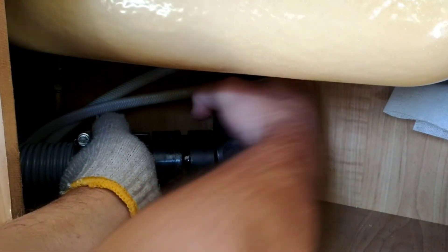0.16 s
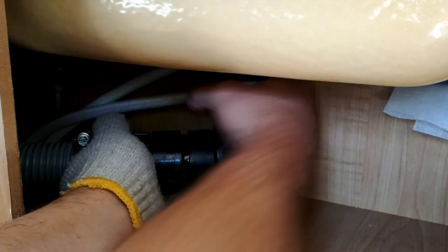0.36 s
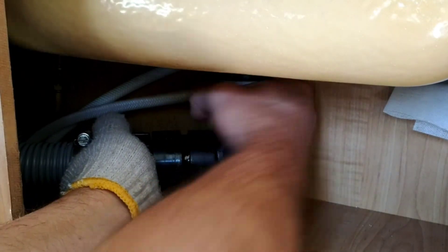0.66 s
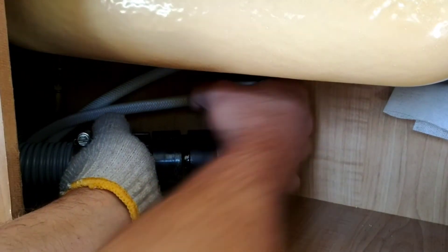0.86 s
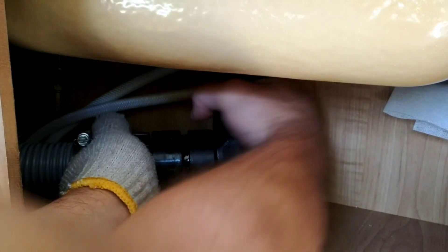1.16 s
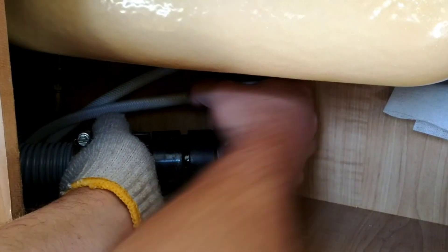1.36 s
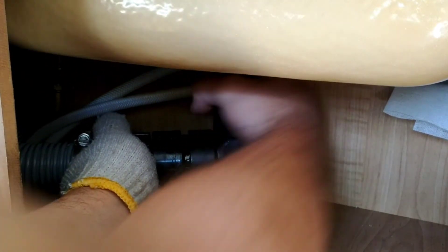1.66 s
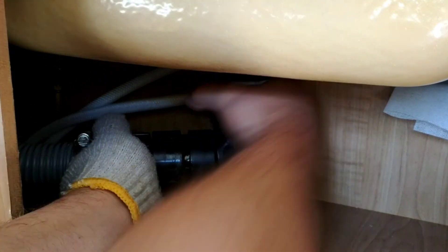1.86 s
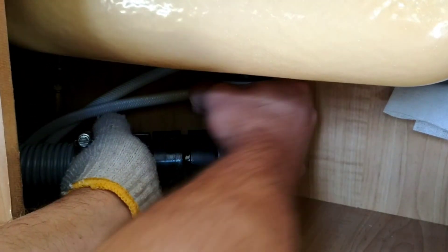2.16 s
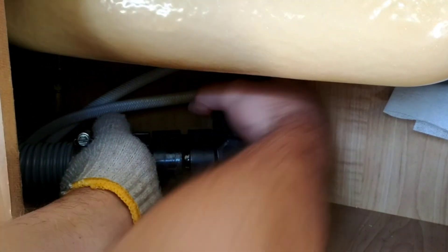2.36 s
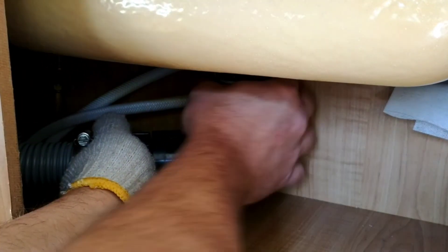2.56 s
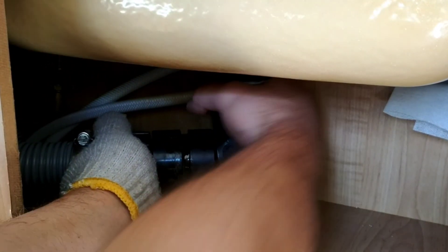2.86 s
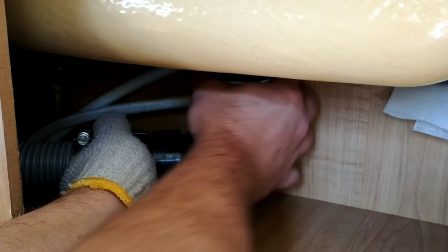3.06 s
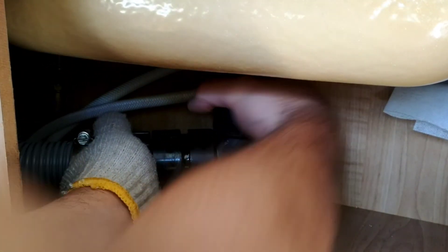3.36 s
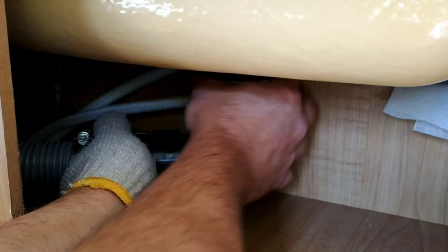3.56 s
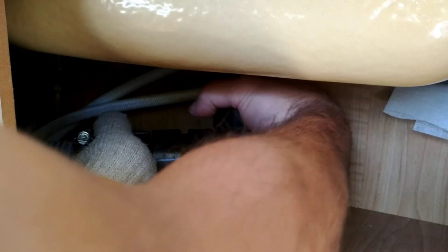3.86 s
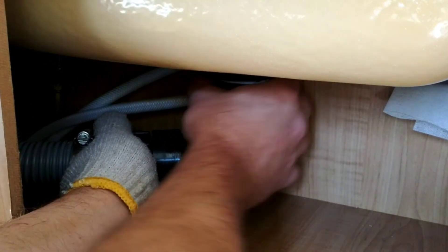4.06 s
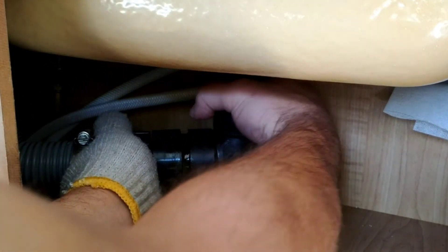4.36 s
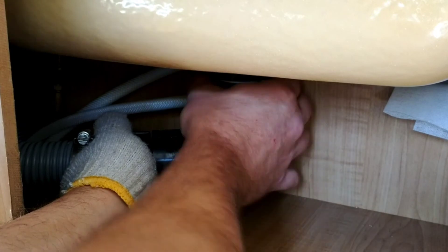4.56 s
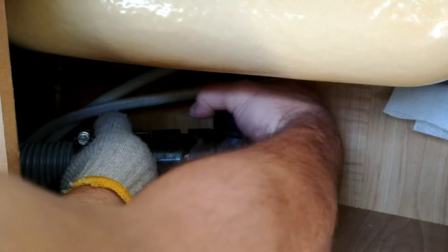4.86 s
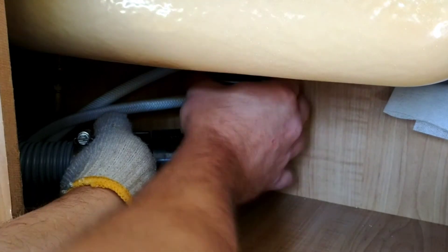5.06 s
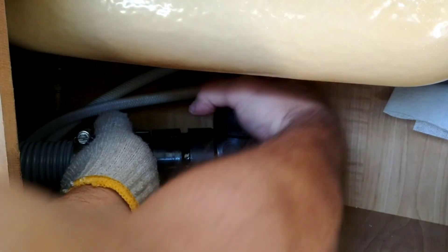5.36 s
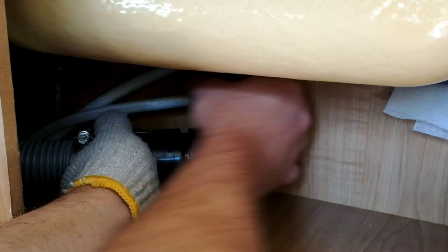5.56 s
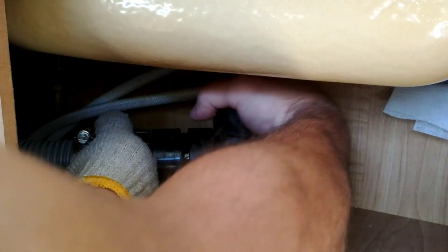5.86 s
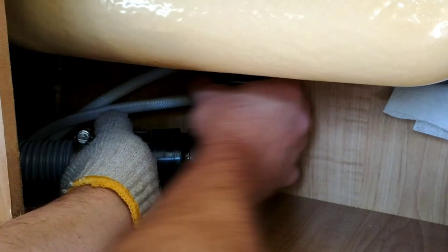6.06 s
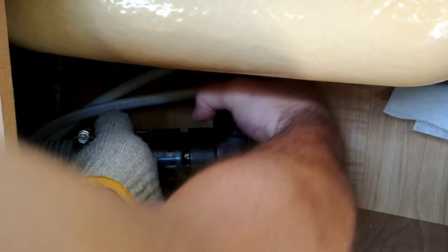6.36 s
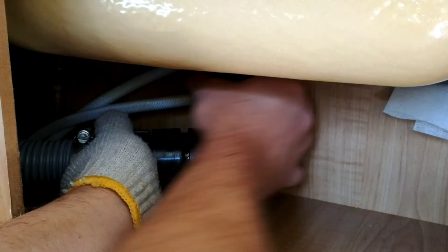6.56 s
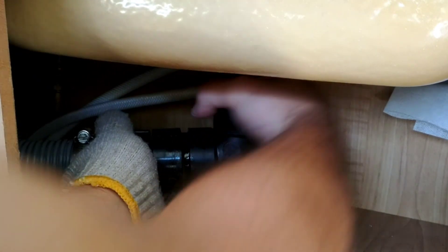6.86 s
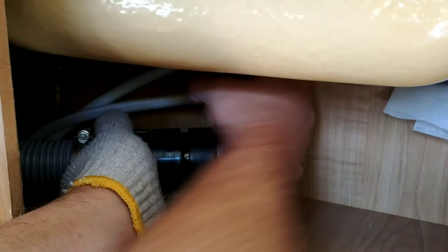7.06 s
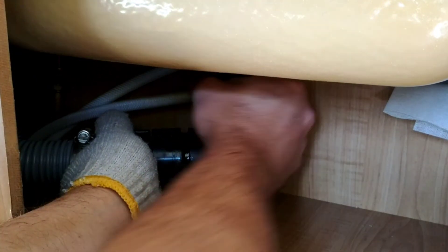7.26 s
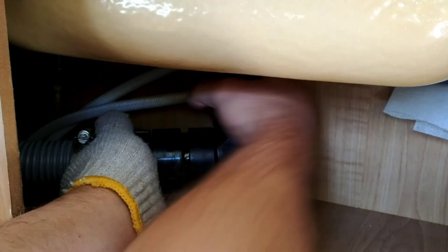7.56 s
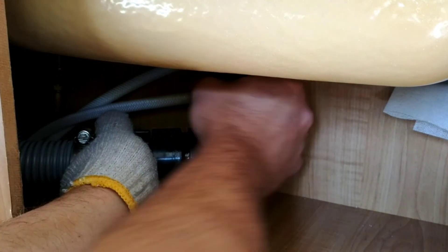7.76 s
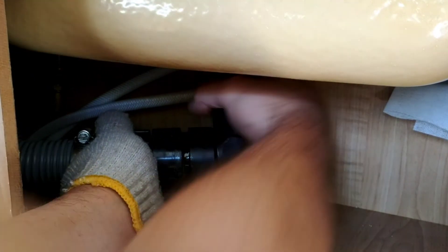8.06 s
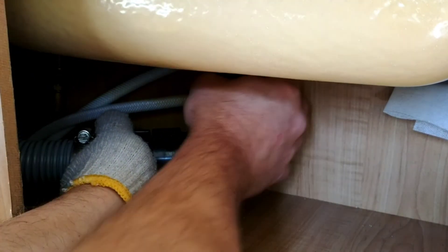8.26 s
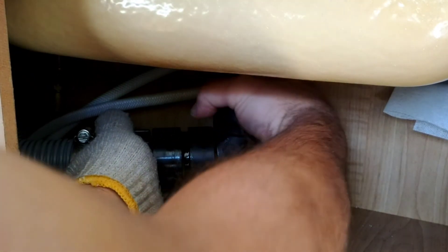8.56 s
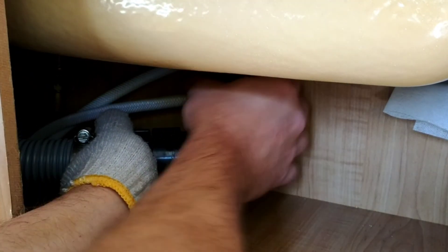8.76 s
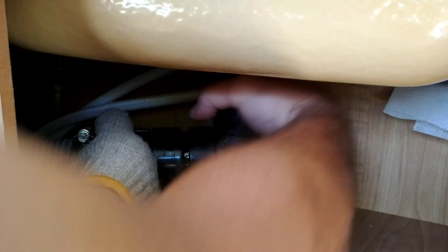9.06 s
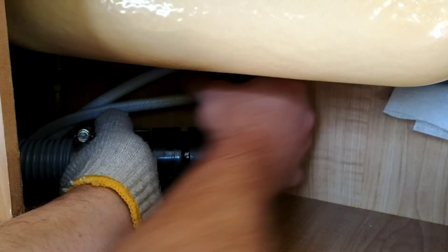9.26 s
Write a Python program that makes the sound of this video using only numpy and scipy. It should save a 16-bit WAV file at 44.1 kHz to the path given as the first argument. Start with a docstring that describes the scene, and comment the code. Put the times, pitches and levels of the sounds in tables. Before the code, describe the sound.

Hand screws a plastic drain nut under a sink, fingers patting twice a second, short rubbing scrapes, plastic clicks and hollow pipe knocks, close and boxy.

```python
"""A bare hand screws a plastic drain fitting home under a sink while a gloved hand steadies the pipe.
About twice a second the fingers pat the nut, then skin and thread rub as it turns; between turns the hand
mostly brushes back. All along, plastic edges click, the loose pipe knocks, thumps and hums, fingers touch
softly and burrs in the thread catch; halfway through the thread squeaks once. Contacts are noise bursts with
the ring of pipe and wooden cabinet, rubbing is many tiny random slips. Glove and room are faint, and a noise
gate turns quiet gaps down."""
import sys
import numpy as np
from scipy import signal
from scipy.fft import rfft, irfft
from scipy.io import wavfile
from scipy.ndimage import uniform_filter1d

SR = 44100
rng = np.random.default_rng(int(sys.argv[2]) if len(sys.argv) > 2 else 0)


def waveform_to_disk(signal):
    """Save audio, clipped to [-1, 1], as 16-bit WAV at the path in sys.argv[1]."""
    frames = np.transpose(np.atleast_2d(signal))
    scaled = np.clip(frames, -1, 1) * 32767
    samples = np.round(scaled).astype(np.int16)
    wavfile.write(sys.argv[1], SR, samples)


N = 414962
TIME = np.arange(N) / SR
RING_SIZE = 6000  # length of one ring, samples

# The hand grips the nut and turns it; levels are before each layer's trim, rub levels are for the stroke's end,
# and a positive swell grows towards that end:
# start_s [s], length_s [s], finger_pat_db [dB], sliding_hiss_db [dB], thread_drag_db [dB], swell_db [dB]
TURNS = [(0.044, 0.15, -31.5, -54, -52.5, 1), (0.555, 0.14, -32.5, -55.5, -58, -6),
         (1.036, .13, -60, -55, -54.5, 11.5), (1.485, .205, -40.5, -58.5, -54, 14),
         (2.063, 0.13, -32.5, -58, -55.5, -2), (2.579, 0.15, -34, -58.5, -58.5, 0),
         (3.104, .13, -49.5, -53.5, -53, 29.5), (3.623, 0.14, -35.5, -55, -52, 12.5),
         (4.162, 0.12, -38.5, -57.5, -55.5, 2.5), (4.65, 0.18, -34.5, -57, -53, 0),
         (5.164, 0.15, -40, -57.5, -52, 0), (5.677, 0.12, -34, -50, -48.5, 7.5),
         (6.186, 0.14, -39, -54.5, -50.5, 2.5), (6.691, 0.14, -45, -52.5, -52.5, 15),
         (7.23, .15, -40.5, -56.5, -51.5, 2), (7.761, .15, -41.5, -55, -57.5, 17),
         (8.285, 0.17, -40.5, -61, -56.5, -5.5), (8.843, 0.17, -44, -52, -55, 18)]
# Between turns the hand mostly brushes back over the fitting; once the thread rubs on without skin hiss.
# Levels as for the turns:
# start_s [s], length_s [s], finger_touch_db [dB], sliding_hiss_db [dB], thread_drag_db [dB]
RETURNS = [(0.306, 0.11, -51.5, -55, -59), (0.809, 0.052, -52.5, -51.5, -53),
           (1.274, 0.067, -60, -57, -53.5), (1.809, 0.053, -48.5, -56, -60.5), (2.308, 0.11, -50, -66, -54),
           (2.865, 0.045, -49, -59.5, -53), (3.37, 0.051, -45, -55.5, -54.5),
           (3.926, 0.07, -54, -54, -54.5), (4.44, 0.11, -49, -54.5, -47.5), (4.904, 0.14, -52, -57, -50.5),
           (5.347, 0.062, -61, -90, -59.5), (5.431, 0.092, -51, -55, -54), (5.862, 0.21, -50, -58, -54.5),
           (6.478, 0.053, -48.5, -56, -52.5), (6.979, 0.079, -66, -49.5, -52),
           (7.541, 0.04, -61, -49, -50.5), (8.086, 0.089, -52, -51.5, -51.5),
           (8.619, 0.075, -49, -51, -52.5), (9.175, 0.087, -62, -50.5, -52.5)]
# Ringing tones of pipe and cabinet, before the grip shifts and damps them:
# pitch_hz [Hz], relative_level_db [dB], time_to_fall_60_db_s [s]
RING_MODES = [(94, -9, 0.07), (147.2, -3, 0.21), (187.5, -3, 0.12), (216.6, -3, 0.46), (335.3, -3, 0.19),
              (383.2, 1, 0.15), (438.3, -4.5, 0.16), (485.3, 1.5, 0.11), (489, -2.5, 0.16),
              (647, -6, 0.096), (664.6, -5, 0.098), (806, -5, .14), (984, 5.5, 0.046), (1117, 5.5, 0.042),
              (1276, 6, 0.13), (1534, 6.5, 0.06), (1840, 1, 0.099), (2095, 4, 0.11), (2720, -6, .12),
              (3690, -1.5, 0.049), (6316, 5, 0.3), (6240, -4, 0.11), (6900, -5, 0.094), (7350, 4, 0.14),
              (7670, 3, 0.15)]
# Tone colour of a hard plastic crack: pitch_hz [Hz], relative_level_db [dB]
CRACK_COLOUR = [(500, -31), (1500, -9.5), (3000, 0.5), (4800, -2), (6300, 0), (8000, 0.5), (10500, -3),
                (13000, -11.5), (16000, -31.5)]
# Tone colour of the pipe body's answer: pitch_hz [Hz], relative_level_db [dB]
BODY_COLOUR = [(50, -10), (100, -4), (210, -4), (480, 0), (900, -2.5), (1700, -8.5), (3000, -19.5),
               (8000, -49.5)]
GRIP_DETUNE = 0.008  # typical shift of a mode from grip to grip, share of its pitch


def undb(db):
    """Decibels to gain."""
    return 10 ** (np.asarray(db) / 20)


def unit(x):
    """Scale to an rms (average strength) of 1."""
    return x / np.sqrt(np.mean(x ** 2))


def add(out, start_s, x):
    """Mix x into out from a start time, or from the beginning if that time is negative."""
    i = max(int(start_s * SR), 0)
    out[i:i + len(x)] += x[:len(out) - i]


def colour(x, points, size=4096):
    """Filter with the given (Hz, dB) outline that never sounds ahead of its input."""
    hz, db = np.transpose(points)
    grid = np.maximum(np.arange(size // 2 + 1) * SR / size, 1)
    outline_db = np.interp(np.log(grid), np.log(hz), db)
    # folding the cepstrum gives the minimum-phase filter
    cepstrum = irfft(np.log(undb(outline_db)))
    cepstrum[1:size // 2] *= 2
    cepstrum[size // 2 + 1:] = 0
    response = irfft(np.exp(rfft(cepstrum)))
    return signal.fftconvolve(x, response)[:len(x)]


def resonate(x, hz, width_hz):
    """One resonance, gain 1 at its centre."""
    return signal.lfilter(*signal.iirpeak(hz, hz / width_hz, fs=SR), x)


def walk(rate_hz):
    """Random wander: straight lines between rate_hz random points a second."""
    knots = rng.standard_normal(int(N / SR * rate_hz) + 2)
    return np.interp(TIME * rate_hz, np.arange(len(knots)), knots)


def mode_width(hz, t60_s):
    """Bandwidth of a mode: its own decay plus the loss of hand-held plastic, which grows with pitch."""
    plastic_loss = 0.006  # extra width, share of the pitch
    return np.log(1000) / np.pi / t60_s + hz * plastic_loss


def ring(modes_db, scatter_db=4.0):
    """Answer to one blow: dense reflections plus the modes, whose shares and pitch shift with the grip."""
    # Dense ring of the small space: pitch_hz [Hz], time_to_fall_60_db_s [s]
    space_decay = [(100, 0.14), (400, 0.19), (1200, 0.11), (3500, 0.1), (8000, 0.13), (16000, 0.025)]
    t = TIME[:RING_SIZE].astype(np.float32)
    grid = np.log(np.maximum(np.arange(RING_SIZE // 2 + 1) * SR / RING_SIZE, 1))
    centres, decays = np.transpose(space_decay)
    noise = rfft(rng.standard_normal(RING_SIZE))
    dense = np.zeros(RING_SIZE)
    for share, t60 in zip(np.eye(len(centres)), decays):
        band = irfft(noise * np.interp(grid, np.log(centres), share))
        dense += band * np.exp(-np.log(1000) * t / t60)

    hz, db, t60 = np.transpose(RING_MODES)[:, :, None]
    hz = hz * (1 + GRIP_DETUNE * rng.standard_normal(hz.shape))
    size = undb(db + modes_db + scatter_db * rng.standard_normal(hz.shape))
    phase = rng.random(hz.shape)
    hz, size, phase, width = np.float32([hz, size, phase, mode_width(hz, t60)])
    tones = size * np.sin(2 * np.pi * (hz * t + phase)) * np.exp(-np.pi * width * t)
    return dense + np.sum(tones, axis=0)


def blow(outline, db, rise_s, snap, snap_s, modes_db):
    """One contact builds up, sheds its first energy fast, then rings; db is the rms of its first 10 ms."""
    t = np.arange(RING_SIZE) / SR
    build_up = 1 - np.exp(-t / rise_s)
    first_burst = 1 + snap * np.exp(-t / snap_s)
    x = colour(ring(modes_db) * build_up * first_burst, outline)
    return undb(db) * x / np.sqrt(np.mean(x[:SR // 100] ** 2))


def friction(outline, slips_per_s, spread_db, flutter_db, resonance):
    """Tiny slips of uneven size, in louder and softer flurries, that excite the modes of the pipe."""
    slips = (rng.random(N) < slips_per_s / SR) * rng.standard_normal(N)
    uneven_db = spread_db * np.clip(rng.standard_normal(N), -2, 2)
    slips = slips * undb(uneven_db + flutter_db * walk(70))
    tap = signal.unit_impulse(RING_SIZE) + 1e-18  # the tiny offset avoids extremely small numbers
    rung = np.zeros(RING_SIZE)
    for hz, db, t60 in RING_MODES:
        width = mode_width(hz, t60) + 2 * GRIP_DETUNE * hz  # wider, to cover the shifts of pitch
        rung += undb(db) * resonate(tap, hz, width)
    response = colour(tap + resonance * rung, outline)
    return unit(signal.oaconvolve(slips, response)[:N])


def near_walls(x, fade_s, share, size=700):
    """Close reflections from pipe and boards comb the sound; the comb wanders slowly at random."""
    t = np.arange(size) / SR
    echoes = rng.standard_normal((2, size)) * np.exp(-t / fade_s)
    first, second = (signal.fftconvolve(x, e / np.linalg.norm(e))[:N] for e in echoes)
    blend = 2 * walk(4)
    return unit(x / 2 + share * (np.cos(blend) * first + np.sin(blend) * second))


def stroke_gains():
    """Hiss, scrape and rumble gains: each stroke takes hold, may stall, reaches its end and dies away."""
    # How hiss, scrape and rumble (one row each) follow a stroke:
    # swell_share [ratio], carry_on_after_end_s [s], release_db_per_s [dB/s]
    follow = [(0.78, 0.0018, 387), (0.99, .004, 258), (0.7, 0.02, 266)]
    return_swell_db = 6.5
    grip_s = 0.015  # friction builds in this time
    lead_s = 0.0056  # skin brushes the plastic just before the fingers land
    lift_s, lift_db_per_s = 0.062, 505  # this long after the end the hand lifts off: an extra, fast fall
    # a stroke that has to swell is stiff: the nut stalls part of the way before it gives
    stall_at, stall_width, stall_depth = 0.45, 0.14, 0.6  # shares of stroke length (two) and of swell
    gains = np.zeros((3, N))
    t = TIME[:SR // 2]
    attack = np.minimum(t / grip_s, 1)
    strokes = list(TURNS) + [(*row, return_swell_db) for row in RETURNS]
    for s, length, _, hiss, drag, swell in strokes:
        stall_shape = np.exp(-((t / length - stall_at) / stall_width) ** 2)
        stall = stall_depth * max(swell, 0) * stall_shape
        effort = -swell * np.maximum(1 - t / length, 0) - stall
        lift = -lift_db_per_s * np.maximum(t - length - lift_s, 0)
        for gain, db, (share, carry_s, release) in zip(gains, (hiss, drag, drag), follow):
            easing = -release * np.maximum(t - length - carry_s, 0)
            add(gain, s - lead_s, attack * undb(db + share * effort + easing + lift))
    return gains


def rubbing(hiss_db=0.5, scrape_db=-2.0, rumble_db=1.0, top_hz=9000, firm_db=-56, brightening=0.82):
    """Skin hisses over the plastic, the thread scrapes, and the drag shakes the pipe."""
    # Tone colours of sliding skin, thread and shaken pipe: pitch_hz [Hz], relative_level_db [dB]
    hiss_colour = [(500, -23.5), (1500, -3.5), (2800, 0), (3700, -0.5), (4900, -5.5), (6400, 0),
                   (7800, -0.5), (8500, -2), (10000, -10), (11500, -8), (13000, -23), (16000, -37)]
    scrape_colour = [(130, -21.5), (270, 9), (420, -0.5), (700, 2.5), (1150, -6), (1650, -19),
                     (3000, -19.5), (8000, -48)]
    rumble_colour = [(25, -32.5), (60, -10.5), (95, -2.5), (140, 1.5), (210, 1.5), (270, -6), (500, -41)]
    hiss, scrape, rumble = stroke_gains()
    slide = friction(hiss_colour, slips_per_s=11000, spread_db=5.5, flutter_db=4, resonance=0.16)
    slide = near_walls(slide, fade_s=0.0049, share=1.8)
    # a firm, fast drag is brighter than a light one
    treble_filter = signal.butter(2, top_hz, "high", fs=SR, output="sos")
    treble = signal.sosfiltfilt(treble_filter, slide)
    slide = slide + treble * ((hiss / undb(firm_db)) ** brightening - 1)
    thread = friction(scrape_colour, slips_per_s=1900, spread_db=1.0, flutter_db=3.5, resonance=0.94)
    shake = friction(rumble_colour, slips_per_s=2500, spread_db=1, flutter_db=4.5, resonance=0.82)
    skin_layer = undb(hiss_db) * hiss * slide
    thread_layer = undb(scrape_db) * scrape * thread
    return skin_layer + thread_layer + undb(rumble_db) * rumble * shake


def grips(pat_db=-6.5, edge_db=-8, finger_gap_s=0.0045, next_finger_db=-2.5, count=3):
    """Fingers slap onto the nut one just after another; the first has a slight bright edge."""
    # Tone colour of a finger pat: pitch_hz [Hz], relative_level_db [dB]
    pat_colour = [(60, -17), (150, -2.5), (260, -8.5), (400, 4.5), (680, -1), (1000, -4.5), (1450, -5),
                  (2300, -12), (3300, -18), (6000, -39.5)]
    # bright edge of a full grip and of a light touch, relative to its pat before the trims
    grip_edge_db, touch_edge_db = -18, -5.5
    out = np.zeros(N)
    for strokes, edge in ((TURNS, grip_edge_db), (RETURNS, touch_edge_db)):
        for s, _, pat, *_ in strokes:
            for finger in range(count):
                unevenness = 1 + 0.2 * np.clip(rng.standard_normal(), -2, 2)
                lag = finger * finger_gap_s * unevenness
                db = pat + pat_db + finger * next_finger_db
                add(out, s + lag, blow(pat_colour, db, rise_s=0.00023, snap=12.0, snap_s=0.053, modes_db=-25.5))
            db = pat + edge + edge_db
            add(out, s, blow(CRACK_COLOUR, db, rise_s=0.00077, snap=1.0, snap_s=0.004, modes_db=-14.5))
    return out


def clicks(crack_db=-10, body_db=-8, top_db=-7, top_per_lightness=0.73, top_per_force=0.56,
           usual_crack_db=-33, max_top_db=3):
    """Mostly plastic edges snapping: a crack, brighter when hard or barely moving the pipe, and a slower body."""
    # Hard plastic edges catching, plus a few soft finger touches and one knock's body;
    # levels before the trims: start_s [s], crack_db [dB], pipe_body_db [dB]
    click_events = [(0.0132, -36.5, -35), (0.0378, -35, -34.5), (0.331, -38, -61), (0.355, -33.5, -49),
                    (0.842, -34.5, -41.5), (1.149, -42, -48), (1.1869, -40, -45), (1.308, -36.5, -75),
                    (1.3237, -30.5, -54), (1.676, -55, -37), (1.8398, -37.5, -49), (1.8615, -40, -53.5),
                    (2.3475, -34.5, -53), (2.37, -33, -49), (2.425, -45.5, -52), (2.825, -53, -53),
                    (2.8934, -28.5, -41.5), (3.228, -42, -50), (3.405, -35.5, -62), (3.874, -53, -47.5),
                    (3.936, -38.5, -44.5), (4.4624, -31, -43), (4.5195, -23, -25.5), (4.9762, -36, -37.5),
                    (5.2605, -34, -43), (5.2686, -18, -23), (5.462, -35, -46), (5.4914, -36, -45),
                    (5.6367, -28, -29), (5.8706, -37.5, -37), (5.9634, -42.5, -46), (5.9986, -29, -34),
                    (6.4983, -34.5, -49), (6.514, -31.5, -50), (7.001, -32.5, -48), (7.0302, -39.5, -43.5),
                    (7.4676, -40.5, -42), (7.543, -35, -56), (7.56, -34, -50), (7.5757, -31, -39),
                    (8.0867, -42.5, -64), (8.104, -37, -69), (8.1218, -32, -43.5), (8.1455, -25, -26.5),
                    (8.4855, -41, -43), (8.6315, -34.5, -41), (8.6642, -34.5, -40), (8.9078, -32.5, -41.5),
                    (9.1887, -35.5, -39), (9.2115, -28, -39)]
    out = np.zeros(N)
    for s, crack, body in click_events:
        lightness, force = crack - body, crack - usual_crack_db
        top = min(top_db + top_per_lightness * lightness + top_per_force * force, max_top_db)
        # the treble change fades in from 7 to 11 kHz
        outline = [(hz, db + top * np.interp(hz, [7000, 11000], [0, 1])) for hz, db in CRACK_COLOUR]
        add(out, s, blow(outline, crack + crack_db, rise_s=0.0017, snap=5.6, snap_s=0.0033, modes_db=-26.5))
        add(out, s, blow(BODY_COLOUR, body + body_db, rise_s=0.0036, snap=0.59, snap_s=0.03, modes_db=-24))
    return out


def knocks(knock_db=-10.0, thump_db=-3):
    """Mostly the pipe taking up its play: a hollow knock and a thump into the cabinet."""
    # Hollow knocks and thumps of the pipe, with a few faint touches of the hand;
    # levels before the trims: start_s [s], hollow_knock_db [dB], low_thump_db [dB]
    knock_events = [(0.118, -36, -67), (0.407, -34, -43.5), (0.481, -56, -67), (0.698, -30, -54),
                    (0.979, -42, -57), (1.139, -31.5, -42), (1.378, -35.5, -46.5), (1.653, -52, -39.5),
                    (1.679, -28.5, -60), (1.705, -29, -43), (1.933, -43, -53), (2.362, -29, -46),
                    (2.424, -31, -49), (2.74, -29, -38), (2.889, -33, -47), (2.928, -36, -44.5),
                    (3.055, -59, -56.5), (3.2, -37.5, -32.5), (3.23, -31, -49), (3.257, -26, -37.5),
                    (3.75, -26.5, -38), (4.298, -39.5, -48), (5.018, -31.5, -39.5), (5.234, -35, -58),
                    (5.344, -39.5, -35.5), (5.512, -34, -53), (5.546, -41.5, -44), (5.835, -41, -71),
                    (6.36, -41, -49), (6.43, -43.5, -74.5), (6.557, -39, -47), (6.865, -45.5, -49.5),
                    (6.94, -71, -61), (7.244, -38.5, -38.5), (7.383, -42, -40), (8.047, -40, -67),
                    (8.526, -43, -43.5), (9.149, -39.5, -70), (9.214, -35, -55)]
    # Tone colours of knock and thump: pitch_hz [Hz], relative_level_db [dB]
    knock_colour = [(100, -15), (300, -16), (400, -10.5), (490, 0), (650, -2), (900, -14), (1150, -28.5),
                    (1700, -34), (6000, -45.5)]
    thump_colour = [(35, -31.5), (65, -15), (100, -4), (145, 2.5), (215, -2.5), (320, -14.5), (700, -37)]
    out = np.zeros(N)
    for s, knock, thump in knock_events:
        add(out, s, blow(knock_colour, knock + knock_db, rise_s=0.0018, snap=2.8, snap_s=0.011, modes_db=-17.5))
        add(out, s, blow(thump_colour, thump + thump_db, rise_s=0.00089, snap=6.2, snap_s=0.0039, modes_db=-14))
    return out


def catches(above_drag_db=-2.5, spread_db=3, count=60):
    """Small burrs in the thread catch at random, as hard as the hand is dragging just then."""
    hiss, scrape, _ = stroke_gains()
    out = np.zeros(N)
    for place, size in rng.random((count, 2)):
        i = int(place * N)
        db = above_drag_db + spread_db * (2 * size - 1)
        tick = hiss[i] * blow(CRACK_COLOUR, db, rise_s=0.0002, snap=4.9, snap_s=0.0018, modes_db=-12)
        tock = scrape[i] * blow(BODY_COLOUR, db, rise_s=0.001, snap=8.7, snap_s=0.0092, modes_db=-3)
        add(out, i / SR, tick + tock)
    return out


def judders(overtone_db=-17, waver=0.013, judder_s=0.032):
    """The fitting sticks and slips in step with a bending mode: a short hum that swells and dies."""
    # The pipe juddering at a low bending mode as a stroke drags: start_s [s], pitch_hz [Hz], level_db [dB]
    pipe_judders = [(0.197, 191, -49), (0.233, 185, -50.5), (1.136, 139, -47), (2.224, 206, -47.5),
                    (2.384, 209, -47), (2.984, 106, -51), (3.205, 134, -42.5), (5.305, 200, -42.5),
                    (5.343, 206, -45), (6.351, 170, -44.5), (6.511, 133, -43), (7.238, 157, -44),
                    (9.209, 113, -41)]
    out = np.zeros(N)
    swell = np.sqrt(2) * np.sin(np.linspace(0, np.pi, int(judder_s * SR)))
    for s, hz, db in pipe_judders:
        drift = 1 + waver * rng.standard_normal() * np.linspace(-1, 1, len(swell))  # pitch glides up or down
        phase = 2 * np.pi * np.cumsum(hz * drift) / SR
        add(out, s, undb(db) * swell * (np.sin(phase) + undb(overtone_db) * np.sin(2 * phase)))
    return out


def squeak(slips_hz=304, level_db=-39.5, jitter=0.082):
    """The thread sticks and slips in a short, nearly regular run that grows until it lets go."""
    # When the thread squeaks: start_s [s], end_s [s]
    squeak_span = (4.753, 4.785)
    # Resonances of the squeak: pitch_hz [Hz], width_hz [Hz], relative_level_db [dB]
    squeak_modes = [(313, 40, 5), (374, 23, 7.5), (720, 110, -30), (1970, 25, -9), (2900, 13, -17),
                    (5000, 160, -10), (6340, 170, -33), (7600, 90, -5), (9480, 240, -4.5)]
    start, end = squeak_span
    slips, out = np.zeros(RING_SIZE), np.zeros(N)
    count = int((end - start) * slips_hz)
    times = np.cumsum(1 + jitter * rng.standard_normal(count)) / slips_hz
    slips[((times - times[0]) * SR).astype(int)] = np.linspace(0.5, 1, count)
    x = sum(undb(db) * unit(resonate(slips, hz, width)) for hz, width, db in squeak_modes)
    loudness = np.std(x[:int((end - start) * SR)])
    add(out, start, undb(level_db) * x / loudness)
    return out


def glove(level_db=-74.5, restless_db=4):
    """The gloved hand shifts faintly on the pipe that it steadies: tiny slips at a wandering level."""
    # Tone colour of the glove's rustle: pitch_hz [Hz], relative_level_db [dB]
    glove_colour = [(120, -13.5), (280, 8), (700, -1.5), (1500, -9.5), (3000, -8), (8000, -8.5),
                    (15000, -30)]
    rustle = friction(glove_colour, slips_per_s=2500, spread_db=3.5, flutter_db=2, resonance=0.93)
    return undb(level_db + restless_db * np.clip(walk(14), -2, 2)) * rustle


def room(level_db=-73):
    """Faint, even background in the cabinet, made from coloured noise."""
    # Tone colour of the background: pitch_hz [Hz], relative_level_db [dB]
    room_colour = [(25, -12.5), (60, -10), (110, -10), (250, -15), (550, -5), (1000, -17), (2500, -20.5),
                   (7000, -23.5), (11000, -20.5), (16000, -38.5)]
    background = colour(rng.standard_normal(N), room_colour)
    return undb(level_db) * unit(background)


def scene():
    """All sounds at one microphone in front of the cabinet."""
    hand = rubbing() + grips()
    fitting = clicks() + knocks() + catches() + judders() + squeak()
    return (hand + fitting + glove() + room())[None]


def record(dry, low_cut_hz=42, threshold_db=-62, knee_db=4, depth_db=11, top_hz=15600):
    """The microphone drops the deepest bass, a noise gate turns quiet gaps down, and the top is cut off."""
    low_cut = signal.butter(2, low_cut_hz, "high", fs=SR, output="sos")
    heard = signal.sosfilt(low_cut, dry)
    power = np.maximum(uniform_filter1d(heard ** 2, size=400), 1e-14)
    # 0 is open; 1, reached one knee below the threshold, is fully turned down
    shut = np.clip((threshold_db - 10 * np.log10(power)) / knee_db, 0, 1)
    gated = heard * undb(-depth_db * uniform_filter1d(shut, size=200))
    top_cut = signal.ellip(8, 0.2, 70, top_hz, fs=SR, output="sos")
    return signal.sosfilt(top_cut, gated)


dry = scene()
out = record(dry)
waveform_to_disk(out)
```